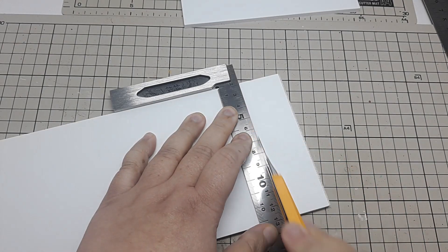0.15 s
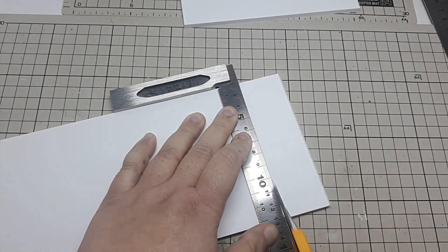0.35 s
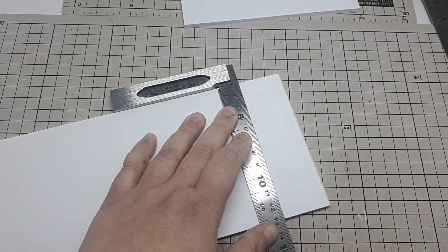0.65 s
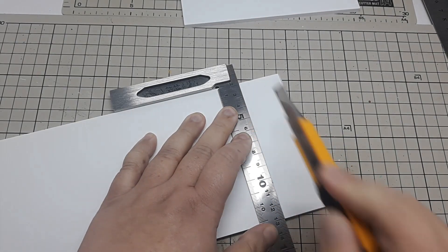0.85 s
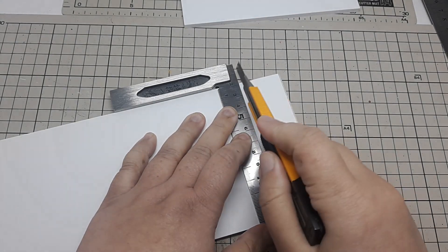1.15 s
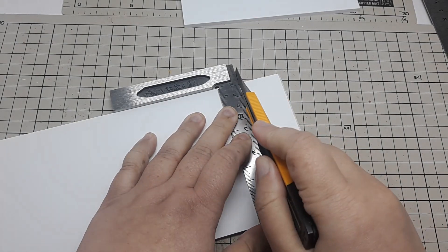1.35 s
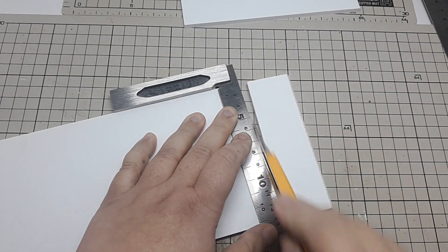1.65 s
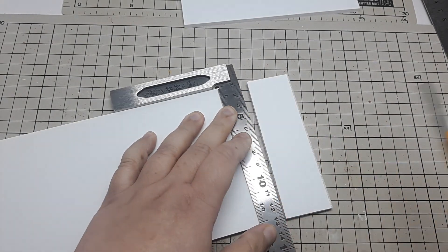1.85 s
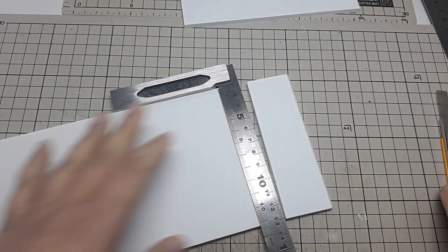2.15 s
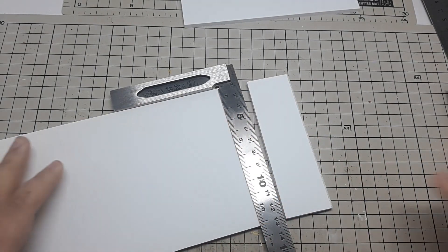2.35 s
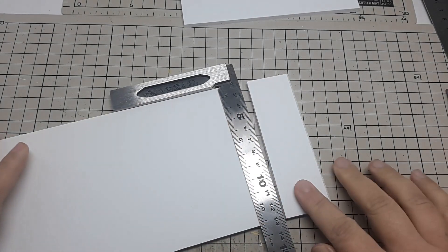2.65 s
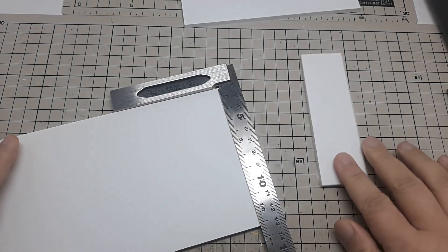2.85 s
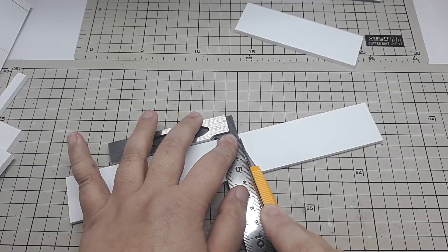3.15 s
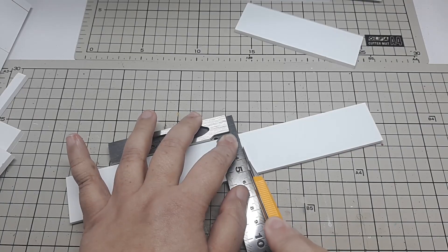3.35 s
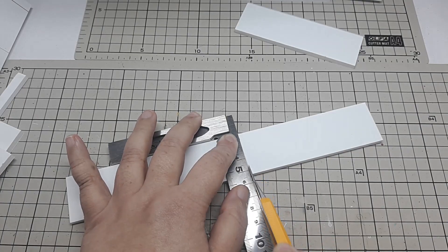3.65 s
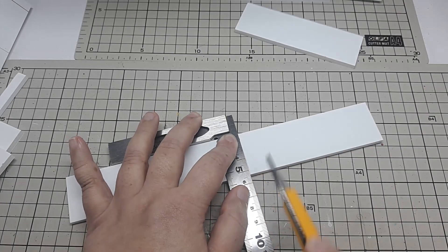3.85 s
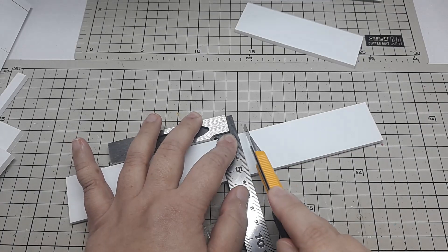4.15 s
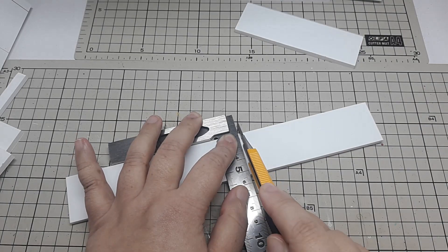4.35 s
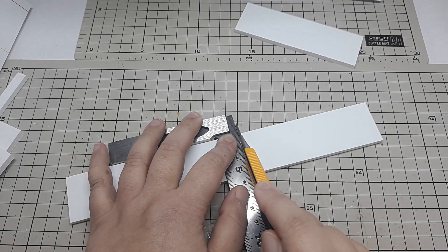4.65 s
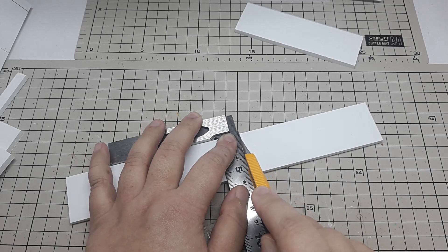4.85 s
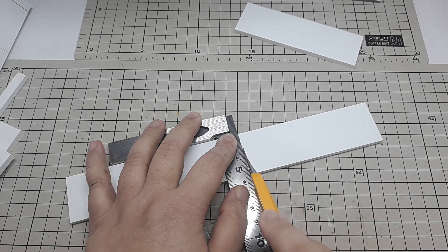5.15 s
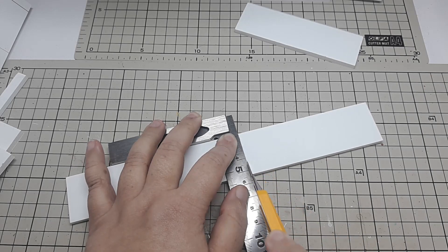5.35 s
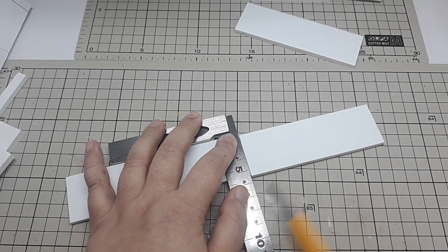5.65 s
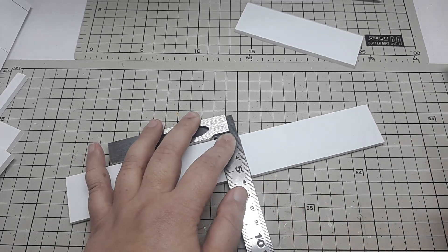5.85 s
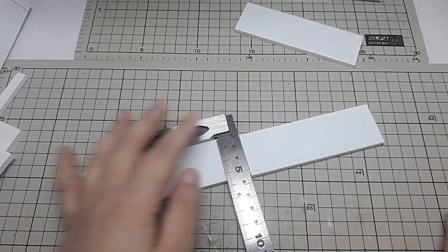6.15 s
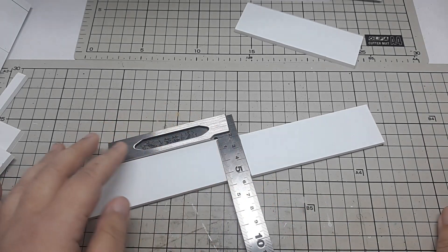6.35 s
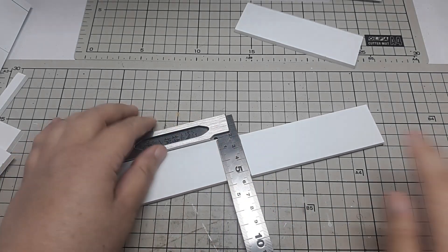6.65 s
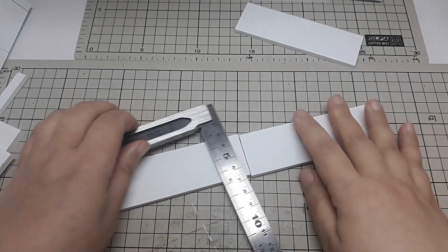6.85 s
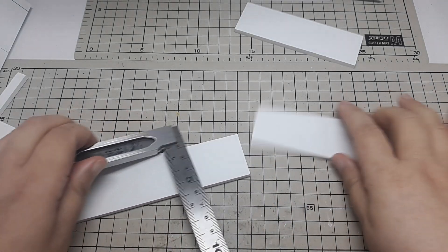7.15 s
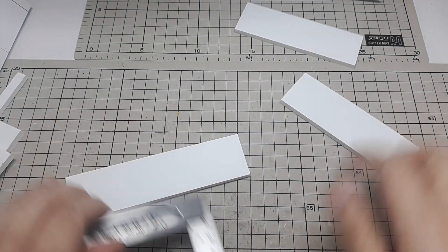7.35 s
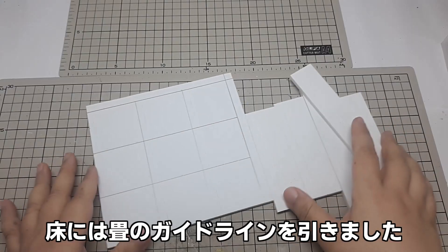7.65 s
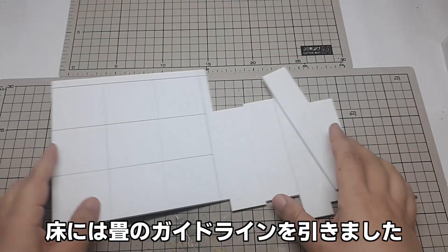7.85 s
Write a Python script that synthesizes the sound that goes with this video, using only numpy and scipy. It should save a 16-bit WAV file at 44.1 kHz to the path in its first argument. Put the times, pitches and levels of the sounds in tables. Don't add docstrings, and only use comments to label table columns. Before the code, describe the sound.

Close stereo pickup of foam board being cut on a hollow table, with little room echo. A strong gritty tear comes first, then a brief scrape with a ringing blade snap and a cluster of heavy knocks and clicks. Two thin, fizzing scores follow with a pause between, the second juddering the table. Quiet clicks and dry scuffs of steel and foam close it, over faint room hiss.

```python
import sys
import numpy as np
from scipy import signal
from scipy.fft import rfft, irfft
from scipy.io import wavfile
from scipy.ndimage import uniform_filter1d

SR = 44100
rng = np.random.default_rng(int(sys.argv[2]) if len(sys.argv) > 2 else 0)


def gain_from_decibels(decibels):
    exponent = np.asarray(decibels, float) / 20
    return 10 ** exponent


def to_wav(s):
    ch = np.atleast_2d(s).T
    pcm = np.round(np.clip(ch, -1, 1) * 32767)
    wavfile.write(sys.argv[1], SR, pcm.astype(np.int16))


N = 352800

# t/s, effort level/dB, fizz of the finest cells/dB over the effort
CUTS = [
    [(0, -53.5, 6), (0.07, -51, 3), (0.14, -52, 4.5), (0.29, -47, 0), (0.45, -48.5, -5), (0.515, -51, -1)],
    [(1.535, -51.5, -7), (1.56, -54.5, -4), (1.6, -53, 1), (1.65, -48, -0.5), (1.72, -47, -7)],
    [(2.96, -60.5, 6), (3.02, -66, 3.5), (3.26, -63.5, 7.5), (3.68, -60.5, 8.5), (3.735, -55, 0),
     (3.752, -59, -8), (3.785, -59, -12)],
    [(4.76, -74, 11), (4.79, -68, 12), (4.85, -66, 13), (4.905, -71.5, 8), (4.955, -62.5, 7),
     (5.23, -60, 6.5), (5.32, -58.5, 5), (5.38, -60, 7), (5.42, -52.5, 7)],
]
# rasp level/dB, shake level/dB, both over the effort
CUT_GRIP = [(-0.5, -4), (-3.5, -3.5), (-0.5, 3), (1, 3)]
CUT_COLOUR = [0, 1, 2, 2]
# f/Hz, density level/dB per Hz
DRUM = [(24, -59.5), (70, -17), (135, -8), (165, -3.5), (188, -3.5), (228, -15.5), (330, -13), (700, -48)]


def cuts(mix):
    for curve, colour, (rasp_db, shake_db) in zip(CUTS, CUT_COLOUR, CUT_GRIP):
        s, effort_db, fizz_db = np.transpose(curve)
        table = DRUM if colour > 1 else SHAKE
        add(mix, *stroke(s, effort_db, fizz_db, rasp_db, shake_db, colour, table))


# t/s, effort level/dB
SLIDES = [
    [(0.53, -49), (0.56, -50.5), (0.6, -50), (0.63, -62.5), (0.675, -59.5)],
    [(0.68, -75), (0.7, -48), (0.725, -93)],
    [(2.71, -53), (2.76, -52), (2.83, -56), (2.885, -65), (2.91, -48)],
    [(5.61, -66.5), (5.645, -50.5), (5.68, -76)],
    [(6.47, -66), (6.51, -60), (6.55, -62)],
    [(6.59, -67), (6.7, -61), (6.81, -61.5)],
    [(6.855, -61.5), (6.96, -53), (7.035, -60)],
    [(7.05, -49.5), (7.08, -52.5), (7.12, -55), (7.15, -49), (7.19, -58)],
    [(7.195, -57), (7.21, -49), (7.225, -49.5), (7.245, -57), (7.255, -72)],
    [(7.607, -60), (7.63, -56.5), (7.68, -59), (7.75, -62.5)],
    [(7.765, -54.5), (7.82, -50.5), (7.87, -43.5), (7.91, -48.5), (7.96, -60.5)],
]
# fizz at start/dB, fizz at end/dB, rasp level/dB, shake level/dB
SLIDE_GRIP = [(-6.5, -13, 2, -4), (11.5, 21.5, -3, -12), (5.5, -4.5, -2, -4.5), (-18.5, 0, -2, -7),
              (-7, -12, 9, 7.5), (-7, 3.5, -2, 0.5), (3.5, 7.5, -12, -8.5), (2, 10.5, -13, -12.5),
              (16.5, 6.5, -11.5, -30), (2.5, -4, -4.5, -10.5), (-2.5, 1.5, -11.5, -26)]
SLIDE_COLOUR = [1, 1, 0, 1, 1, 1, 3, 4, 3, 0, 1]


def slides(mix):
    for curve, colour, grip in zip(SLIDES, SLIDE_COLOUR, SLIDE_GRIP):
        s, effort_db = np.transpose(curve)
        fizz_start_db, fizz_end_db, rasp_db, shake_db = grip
        fizz_db = np.interp(s, s[[0, -1]], [fizz_start_db, fizz_end_db])
        add(mix, *stroke(s, effort_db, fizz_db, rasp_db, shake_db, colour, SHAKE))


# start t/s, end t/s, effort at start/dB, effort at end/dB, fizz/dB over the effort
SHUFFLES = [(0.759, 1.0, -72, -71.5, -19), (1.45, 1.52, -76.5, -62.5, 4), (1.748, 2.135, -72.5, -70.5, 1),
            (2.445, 2.679, -79, -63.5, -5), (4.128, 4.177, -82, -92, 14), (4.376, 4.455, -84, -92, 8.5),
            (5.451, 5.602, -65, -71.5, -13), (6.118, 6.349, -73, -74, 3.5), (7.259, 7.379, -68.5, -74, 7.5),
            (7.388, 7.594, -77, -74.5, -9.5)]


def shuffles(mix):
    for start, end, from_db, to_db, fizz_db in SHUFFLES:
        s, effort_db = np.array([start, end]), np.array([from_db, to_db])
        add(mix, *stroke(s, effort_db, np.full(2, fizz_db), 0, 2.25, 1, SHAKE))


# f/Hz, density level/dB per Hz
HISS = [
    [(1060, -48), (1800, -9), (2100, -3.5), (3350, -5), (4530, -0.5), (7840, -10.5), (14200, -7.5),
     (16000, -10)],
    [(1060, -2.5), (1800, 8.5), (2080, 6), (2670, 8), (5340, 1.5), (10500, -16.5), (16000, -16.5)],
    [(1060, -30), (1800, -12.5), (3060, -3), (4740, -2.5), (5440, -1), (6590, -6), (10000, -8),
     (13400, 2.5), (16000, -3)],
    [(1060, -1.5), (1800, 7), (2550, 6), (4450, -3.5), (6650, -3.5), (7910, -13), (10100, -10),
     (11000, -5.5), (12000, -13), (16000, -16.5)],
    [(1060, -4), (1800, 5.5), (2500, 2.5), (4200, 0), (7000, -4.5), (10000, -9.5), (13500, -10),
     (16000, -13.5)],
]
# share of the direct sound, delay/s, drift per half second
ECHO = [(0.12, 0.000282, 0.14), (0.056, .00043, .07), (0.13, 0.000438, 0.054), (0.12, 0.000264, .1),
        (0.16, 0.0003, .2)]
# f/Hz, density level/dB per Hz
RASP = [(240, -23.5), (330, -8.5), (440, -9), (545, -1.5), (730, -7.5), (900, -4), (1390, -12), (2200, -15),
        (2860, -50.5), (4840, -120)]
# f/Hz, density level/dB per Hz
SHAKE = [(24, -58.5), (40, -37.5), (75, -14.5), (118, -6.5), (172, -1.5), (197, -1), (226, -15.5),
         (262, -11), (335, -5.5), (450, -13.5), (500, -12.5), (650, -38), (1100, -120)]
# f/Hz, left-right likeness
SAME = [(60, 0.88), (180, 0.94), (550, 0.48), (1650, 0.058), (4970, 0.047), (15000, 0.15)]


def stroke(s, effort_db, fizz_db, rasp_db, shake_db, colour, table):
    swing = effort_db - effort_db.max()
    rasp_curve = effort_db + rasp_db - (1 - 0.71) * swing
    shake_curve = effort_db + shake_db - (1 - 0.54) * swing
    t = np.arange(s[0] - .008, s[-1] + .016, 1 / SR)
    curves = effort_db, fizz_db, rasp_curve, shake_curve
    hiss, fizz, rasp, shake = (np.interp(t, s, curve) for curve in curves)

    catch = uniform_filter1d(rng.standard_normal(len(t)), size=300)
    catch = evened(uniform_filter1d(catch, size=300))
    flicker = 1.06 * catch
    slips = 4.0 * evened(uniform_filter1d(catch, size=450))
    sizes = gain_from_decibels(2.0 * np.minimum(rng.exponential(1, (3, 2, len(t))), 5))
    cells = rng.standard_normal((3, 2, len(t))) * sizes

    tearing = patchy(coloured(cells[0], HISS[colour], SAME), *ECHO[colour])
    split = signal.butter(2, 9000, fs=SR, output="sos")
    coarse = signal.sosfiltfilt(split, tearing)
    fine = tearing - coarse
    sound = gain_from_decibels(hiss + flicker) * (evened(coarse) + gain_from_decibels(fizz) * evened(fine))
    sound += gain_from_decibels(rasp + flicker) * coloured(cells[1], RASP, SAME)
    sound += gain_from_decibels(shake) * coloured(cells[2] * gain_from_decibels(slips), table, SAME)
    return t[0], 0.78 * sound * signal.windows.tukey(len(t), 700 / len(t))


def patchy(x, echo, late, drift):
    hz, t, z = signal.stft(x, SR, nperseg=256)
    field = uniform_filter1d(rng.standard_normal(z.shape[1:]), size=2, axis=0)
    field = evened(uniform_filter1d(field, size=50, axis=1))
    delay = late * (1 + drift * t / .5)
    comb = 1 + echo * np.exp(-2j * np.pi * hz[:, None] * delay)
    return signal.istft(z * comb * gain_from_decibels(2.0 * field), nperseg=256)[1][:, :x.shape[1]]


# t/s, peak level/dB
SLIPS = [(.013, -49), (.056, -42.5), (.104, -48), (.146, -42), (.19, -46), (.228, -49), (.278, -41),
         (.334, -46), (.386, -48), (.429, -50), (.479, -50), (1.635, -46.5), (1.67, -45), (3.112, -56),
         (3.144, -51), (3.203, -48.5), (3.237, -50.5), (3.276, -52), (3.317, -51.5), (3.374, -52),
         (3.398, -52), (3.466, -52), (3.517, -52), (3.568, -49), (3.609, -53), (3.711, -48.5), (4.771, -53),
         (4.81, -56), (4.88, -54.5), (4.902, -57), (4.938, -47), (4.994, -44), (5.023, -49), (5.05, -45),
         (5.092, -48), (5.114, -49), (5.148, -47.5), (5.17, -47), (5.218, -49), (5.248, -43), (5.28, -48),
         (5.309, -45), (5.34, -41.5), (5.4, -46), (5.432, -35.5)]


def slips(mix):
    swell_s = 0.0451
    t = np.arange(0, swell_s, 1 / SR)
    for s, db in SLIPS:
        detune, turn = rng.uniform(-1, 1, 2)
        hz = 177.1 * (1 + 0.074 * detune)
        swell = np.sin(np.pi * t / swell_s) ** 2 * np.sin(2 * np.pi * hz * t + np.pi * turn)
        add(mix, s - swell_s / 2, gain_from_decibels(db) * np.ones((2, 1)) * swell)


# start t/s, end t/s, from f/Hz, to f/Hz, level/dB
WHINES = [(7.195, 7.245, 1560, 1600, -54.5), (7.195, 7.24, 4300, 4450, -55.5),
          (7.195, 7.245, 5800, 5900, -55), (7.2, 7.235, 3700, 3700, -59), (6.87, 7.04, 2100, 2100, -68),
          (6.89, 7.04, 2450, 2800, -68), (7.05, 7.18, 2150, 2400, -62), (7.05, 7.17, 2800, 2550, -62),
          (7.045, 7.1, 5700, 6200, -66), (7.12, 7.18, 5400, 5250, -64), (4.8, 4.9, 740, 780, -65),
          (4.79, 4.9, 960, 940, -69.5), (.02, .34, 860, 880, -57), (.02, 0.238, 510, 540, -56.5),
          (.12, 0.23, 650, 640, -54), (.675, .725, 5300, 5000, -49), (0.49, .62, 2100, 2050, -58),
          (.53, 0.627, 1250, 1230, -59), (7.38, 7.62, 220, 203, -70), (2.865, 2.9, 950, 700, -52)]


def whines(mix):
    alike = .5
    for start, end, from_hz, to_hz, db in WHINES:
        count = round((end - start) * SR)
        a, b = rng.standard_normal((2, count)) + 1j * rng.standard_normal((2, count))
        pair = [a, alike * a + np.sqrt(1 - alike ** 2) * b]
        r = np.exp(-np.pi * .07 * from_hz / SR)
        slow = signal.lfilter([1], [1, -2 * r, r * r], pair)
        glide = np.linspace(from_hz, to_hz, count)
        turn = np.exp(2j * np.pi * np.cumsum(glide) / SR)
        sound = evened((slow * turn).real) * signal.windows.tukey(count, .5)
        add(mix, start, gain_from_decibels(db) * sound)


# t/s, peak level/dB, ring f/Hz, top-end level/dB over the whole
STEEL_TICKS = [(0.5199, -26, 3600, -3.5), (0.701, -32.5, 5330, -9), (0.8957, -46.5, 4160, -9),
               (0.908, -47, 4150, -10), (1.5256, -23.5, 3900, 2.5), (1.7246, -31, 7060, 9),
               (1.729, -17.5, 6940, 7), (1.8734, -42, 5460, 7), (2.1491, -10, 3060, 1),
               (2.3579, -20.5, 5270, -2), (2.402, -23, 12800, -9), (2.424, -33.5, 5200, -3),
               (2.5978, -47, 3540, -4.5), (2.9203, -20.5, 6350, 3.5), (4.505, -30, 13900, -6),
               (5.425, -26.5, 7200, 1.5), (5.658, -36, 5030, 4), (6.075, -49.5, 6860, 2.5),
               (6.53, -35, 5980, -1), (6.559, -34, 7800, -3), (6.5636, -28.5, 6700, 0.5),
               (1.714, -40, 2900, -16), (1.884, -52, 5100, -15), (0.693, -33, 9200, 0)]


def steel_ticks(mix):
    for row in STEEL_TICKS:
        add(mix, *tick(*row, t60=.019))


# t/s, peak level/dB, ring f/Hz, top-end level/dB over the whole
SCUFFS = [
    (3.7943, -36, 5220, -1.5),
    (5.641, -37, 5800, -4),
    (6.6246, -36, 6000, -1),
    (6.6685, -43.5, 4590, -3),
]


def scuffs(mix):
    for row in SCUFFS:
        add(mix, *tick(*row, t60=0.034))


# t/s, peak level/dB, top-end level/dB over the whole
DULL_TICKS = [(0.6676, -50, -7), (1.351, -56.5, -30), (1.8237, -39, -17), (2.1635, -24, 2),
              (2.316, -38.5, -9.5), (2.699, -28, 6.5), (5.94, -55, 8), (6.287, -52, -8),
              (6.4554, -36.5, -12.5), (6.5467, -54, -4), (6.826, -35.5, -10), (6.8366, -31.5, 5),
              (7.6542, -36, 0.5), (7.9705, -30.5, -8)]


def dull_ticks(mix):
    for s, db, top_db in DULL_TICKS:
        add(mix, *tick(s, db, 2030, top_db, t60=0.024))


# t/s, peak level/dB
SPECKS = [(0.196, -32), (1.7924, -37.5), (1.8045, -48), (1.8585, -46), (1.917, -35.5), (1.9335, -39),
          (1.9674, -44.5), (1.985, -39), (2.849, -31), (4.123, -57), (5.775, -47), (6.0005, -47.5),
          (7.242, -41), (7.9848, -29), (0.632, -44), (0.692, -39), (2.391, -29), (1.717, -51),
          (1.8125, -52), (1.8165, -52), (1.852, -53), (1.8668, -43), (1.9055, -55), (1.929, -48),
          (1.962, -54), (1.979, -49.5), (7.234, -47)]


def specks(mix):
    for s, db in SPECKS:
        add(mix, *tick(s, db, 13010, 1.5, t60=.011))


def tick(s, db, ring_hz, top_db, t60):
    rise = .11 * t60
    tint = [(900, -30), (2000, -2.0 * np.log2(ring_hz / 2000))]
    tint += [(0.745 * ring_hz, 0), (ring_hz, 5), (1.24 * ring_hz, 0)]
    tint += [(8000, .5 * top_db), (11000, top_db - 2.5), (16000, top_db)]
    lag = rng.integers(-4, 3)
    crack = 0.77 * burst(tint, t60, rise, 0.73, lag)
    crack += burst(tint, .3 * t60, 0.59 * rise, 0.73, lag)
    return s - 1.2 * rise, 2.85 * gain_from_decibels(db) * sides(rng.uniform(0.36, 1.3)) * crack


# t/s, thud peak level/dB, clack level/dB, clack f/Hz
MIDDLE_KNOCKS = [(0.517, -40, -40.5, 542), (2.149, -27, -29, 958), (2.594, -35, -54, 427),
                 (2.683, -33.5, -56, 497), (2.918, -27, -37, 883), (3.74, -42, -63, 447),
                 (4.125, -55, -79, 539), (4.504, -53.5, -59.5, 550), (4.93, -49, -61, 511),
                 (5.42, -46, -48.5, 433), (6.775, -49, -75, 400), (6.668, -53, -70, 400),
                 (6.826, -43, -48.5, 1037), (2.6944, -38.5, -61, 600)]


def middle_knocks(mix):
    for s, thud_db, clack_db, clack_hz in MIDDLE_KNOCKS:
        add(mix, *knock(s, thud_db, 173, clack_db, clack_hz, 1.19))


# t/s, thud peak level/dB, thud f/Hz, clack level/dB, clack f/Hz
RIM_KNOCKS = [(0.683, -60, 320, -47, 626), (1.128, -55, 298, -63, 910), (1.185, -51, 295, -74, 440),
              (1.349, -50, 350, -54, 443), (1.523, -43, 322, -44.5, 430), (1.822, -26, 339, -36.5, 524),
              (2.147, -23, 301, -23.5, 602), (2.313, -41, 312, -41, 928), (2.356, -21.5, 343, -32.5, 513),
              (2.398, -26, 330, -37, 530), (2.816, -59, 299, -41, 1130), (2.847, -50, 326, -38.5, 600),
              (2.865, -43, 304, -39.5, 900), (3.79, -51.5, 370, -51, 594), (5.636, -51, 458, -58, 478),
              (6.452, -40, 324, -46.5, 777), (6.5286, -33.5, 312, -45.5, 460),
              (6.563, -40, 308, -53.5, 506), (6.696, -42, 330, -52, 470), (6.825, -36, 564, -48, 595),
              (7.225, -52, 310, -48, 1556), (7.655, -54, 312, -52.5, 480), (7.968, -46.5, 400, -46.5, 453),
              (2.164, -25.5, 310, -36, 450), (2.424, -37, 324, -51, 450)]


def rim_knocks(mix):
    for row in RIM_KNOCKS:
        add(mix, *knock(*row, 0.77))


# f/Hz, level/dB, t60/s
TABLE = [(82, -16, 0.14), (190, -0.5, 0.078), (312, -3.5, 0.098), (397, -11.5, 0.04), (474.6, -15, 0.15)]
# f/Hz, density level/dB per Hz
BOARD = [(250, -42), (420, -7.5), (820, -10), (1110, -8.5), (1530, -18), (2300, -25), (2990, -59.5),
         (5060, -120)]


def knock(s, thud_db, thud_hz, clack_db, clack_hz, ring_scale):
    t = np.arange(6000) / SR
    attack = 1 - np.exp(-t / 0.0016)
    thud = ring(t, thud_hz, .06 * ring_scale)
    for hz, db, t60 in TABLE:
        detune, luck = rng.uniform(-0.7, 1, 2)
        mode_db = db + 2.0 * luck - 4.54 * abs(np.log2(hz / thud_hz))
        thud += gain_from_decibels(mode_db) * ring(t, hz * (1 + 0.038 * detune), t60 * ring_scale)
    thud *= attack * signal.windows.tukey(2 * len(t), .3)[len(t):]

    clack_t = t[:4096]
    phase = np.array([[.5], [-.5]]) * clack_hz / 900
    clack = burst(BOARD, .05 * ring_scale, 0.00082, 0.95, rng.integers(-9, 9))
    clack += 1.07 * ring(clack_t, clack_hz, .05 * ring_scale, phase) * attack[:4096]
    clack = np.pad(clack, [(0, 0), (0, len(t) - len(clack_t))])
    return s + 0.001446, 1.16 * gain_from_decibels(thud_db) * thud / abs(thud).max() + 1.48 * gain_from_decibels(clack_db) * clack


# t/s, f/Hz, t60/s
RINGS = [(1.7255, 7117, 0.015), (1.729, 7150, .1), (1.728, 13100, 0.012), (.535, 560, .15),
         (7.225, 1600, 0.033), (2.1486, 2450, .011), (2.15, 1077, 0.053), (1.7285, 14300, .05),
         (2.148, 646, .045), (2.148, 458, 0.074), (2.151, 947, .04), (2.866, 760, 0.071),
         (2.866, 1000, 0.051), (2.925, 750, 0.076), (7.232, 455, 0.086), (7.222, 5200, 0.027),
         (2.1495, 6850, 0.023), (2.152, 2083, 0.03), (2.151, 5600, 0.036), (2.849, 613, .05),
         (4.375, 188, .15), (3.3, 190, .3), (1.824, 520, 0.053), (2.357, 400, 0.063)]
RINGS_DB = [-8, -40.5, -13, -45, -40, -10.5, -25, -27, -20.5, -21, -31.5, -33.5, -32, -38, -49, -52, -20.5,
            -28.5, -25.5, -36, -57, -62, -35.5, -29]


def part_rings(mix):
    t = np.arange(8000) / SR
    for (s, hz, t60), db in zip(RINGS, RINGS_DB):
        pair = ring(t, hz, t60) + 0.39 * ring(t, 0.88 * hz, 0.32 * t60)
        lag = min(max(1, round(6500 / hz)), 9)
        both = np.array([pair, np.roll(pair, lag)]) * (1 - np.exp(-t / 0.00085))
        add(mix, s, gain_from_decibels(db) * sides(1.5) * both)


# t/s, f/Hz, t60/s, level/dB
SNAPS = [(6.5623, 4600, .009, -29), (6.5623, 7600, .009, -29), (6.5582, 7800, .008, -37),
         (6.6232, 7300, .008, -38), (6.628, 4700, .012, -41), (6.548, 9000, .008, -46),
         (6.543, 11000, .008, -50), (6.609, 9000, .01, -52), (6.616, 6500, .015, -51),
         (2.357, 1750, .03, -36), (2.402, 1700, .03, -42), (2.402, 1120, .035, -40),
         (1.524, 1500, .03, -42), (1.525, 8200, .03, -42), (.668, 9000, .02, -50), (.519, 1600, .03, -44),
         (2.163, 190, .13, -30), (2.366, 194, .15, -36), (1.83, 180, .16, -40), (1.731, 4600, .015, -30),
         (1.711, 1150, .03, -46), (1.724, 1120, .04, -44)]


def snaps(mix):
    t = np.arange(8000) / SR
    for s, hz, t60, db in SNAPS:
        tone = ring(t, hz, t60) * (1 - np.exp(-t * hz))
        add(mix, s, gain_from_decibels(db) * sides(1.5) * np.array([tone, np.roll(tone, 1)]))


# t/s, peak level/dB
HEELS = [
    (2.594, -43.5),
    (2.686, -42),
    (2.918, -42),
    (.01, -48.5),
    (5.76, -64),
]


def heels(mix):
    t = np.arange(9000) / SR
    sway = ring(t, 84.6, 0.23) * (1 - np.exp(-t / 0.0051))
    for s, db in HEELS:
        add(mix, s, gain_from_decibels(db) * np.ones((2, 1)) * sway)


# f/Hz, t60/s
WALLS = [(200, 0.25), (1000, 0.15), (5000, 0.14), (15000, 0.044)]


def walls(x):
    taps = rng.choice([-1., 1.], (2, 16000)) * (rng.random((2, 16000)) < .05)
    taps[:, :200] = 0
    hz, t, z = signal.stft(taps, SR, nperseg=256)
    alike = np.exp(-(hz[:, None] / 450) ** 2)
    z[1] = alike * z[0] + np.sqrt(1 - alike ** 2) * z[1]
    decay = gain_from_decibels(-60 * t / read(WALLS, hz)[:, None])
    tail = signal.istft(z * decay, SR, nperseg=256)[1]
    return signal.fftconvolve(x, tail / np.linalg.norm(tail[0]), axes=1)[:, :N]


# f/Hz, density level/dB per Hz
ROOM_TONE = [(12, -38), (20, -12), (32, -48.5), (60, -16.5), (113, -24.5), (187, -10), (228, -17),
             (472, -21.5), (527, -17), (574, -24.5), (2910, -28.5), (9500, -41), (16000, -41.5)]
# f/Hz, left-right likeness
ROOM_SAME = [(60, 0.46), (380, 0.52), (2380, -0.15), (15000, 0.2)]


def room_tone():
    hz, width = 527, 5
    on, off = 2.96, 6.45
    line = [(hz - 3 * width, -60), (hz - width, -10), (hz, 0), (hz + width, -10), (hz + 3 * width, -60)]
    running = abs(np.arange(N) / SR - (on + off) / 2) < (off - on) / 2
    fan = coloured(rng.standard_normal((2, N)), line, ROOM_SAME) * running
    fan = fan / np.sqrt(uniform_filter1d(fan ** 2, size=2000) + 0.17)
    wash = coloured(rng.standard_normal((2, N)), ROOM_TONE, ROOM_SAME)
    return gain_from_decibels(-66) * wash + gain_from_decibels(-78) * fan


def burst(tint, t60, rise, alike, lag):
    t = np.arange(4096) / SR
    left, right = coloured(rng.standard_normal((2, len(t))), sorted(tint), [(0, alike), (SR, alike)])
    blow = (1 - np.exp(-t / rise)) ** 2 * gain_from_decibels(-60 * t / max(t60, .004))
    return np.array([left, np.roll(right, lag)]) * blow


def ring(t, hz, t60, phase=0):
    return gain_from_decibels(-60 * t / t60) * np.sin(2 * np.pi * hz * t + phase)


def coloured(pair, spectrum, same):
    hz = np.fft.rfftfreq(pair.shape[1], 1 / SR)
    a, b = rfft(pair) * gain_from_decibels(read(spectrum, hz))
    c = np.clip(read(same, hz), -1, 1)
    both = np.array([a, c * a + np.sqrt(1 - c ** 2) * b])
    return evened(irfft(both, pair.shape[1]))


def evened(x):
    return x / np.sqrt(np.mean(x ** 2) + 1e-20)


def read(points, hz):
    f, value = np.transpose(points)
    return np.interp(np.log(hz + 1), np.log(f + 1), value)


def sides(pan_db):
    return gain_from_decibels(np.array([[.5], [-.5]]) * pan_db)


def add(mix, s, sound):
    at = round(s * SR)
    sound = sound[:, max(-at, 0):]
    part = mix[:, max(at, 0):][:, :sound.shape[1]]
    part += sound[:, :part.shape[1]]


def scene():
    strokes, hits = np.zeros((2, N)), np.zeros((2, N))
    for play in (cuts, slides, shuffles, slips, whines):
        play(strokes)
    for play in (steel_ticks, scuffs, dull_ticks, specks, middle_knocks, rim_knocks, part_rings, snaps, heels):
        play(hits)
    hits = signal.sosfilt(signal.butter(2, 75, "high", fs=SR, output="sos"), hits)
    return strokes + hits + gain_from_decibels(-15.5) * walls(hits) + room_tone()


def low_pass(x):
    return signal.sosfilt(signal.butter(12, 16680, fs=SR, output="sos"), x)


def record(dry):
    edge = signal.firwin(401, 15850, window=("kaiser", 4), fs=SR)
    mix = signal.oaconvolve(dry, edge[None], "same") - .0005
    return low_pass(mix)


dry = scene()
out = record(dry)
to_wav(out)
```